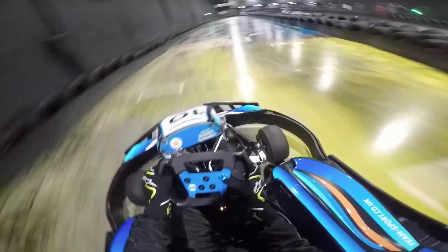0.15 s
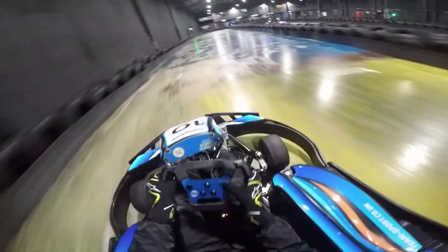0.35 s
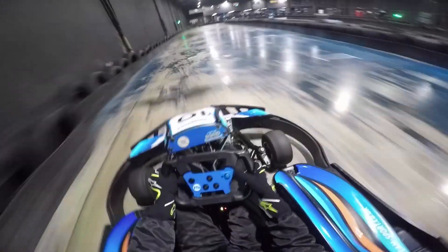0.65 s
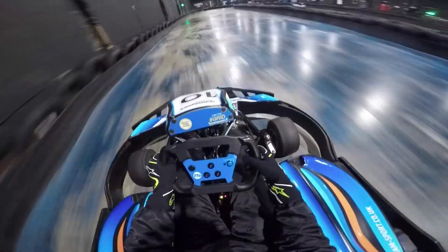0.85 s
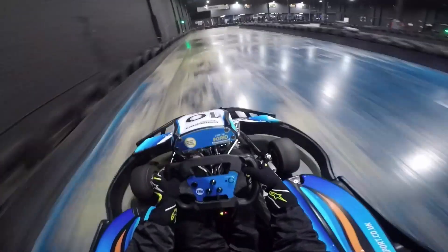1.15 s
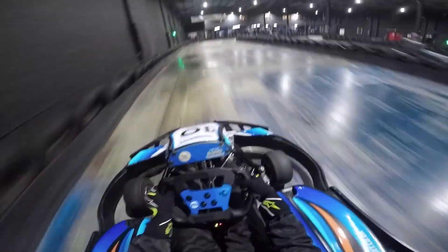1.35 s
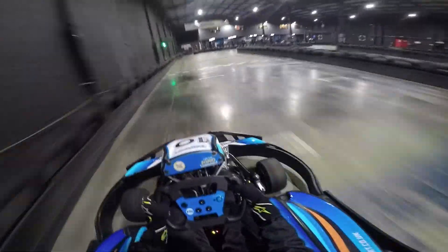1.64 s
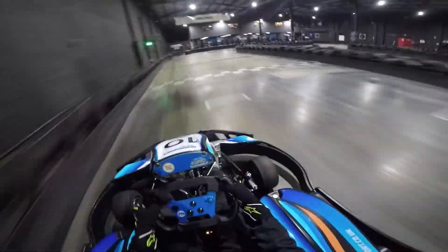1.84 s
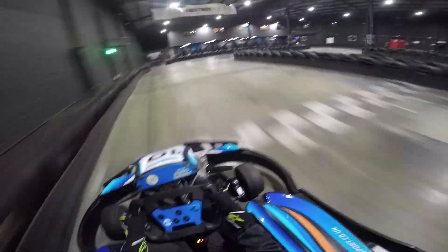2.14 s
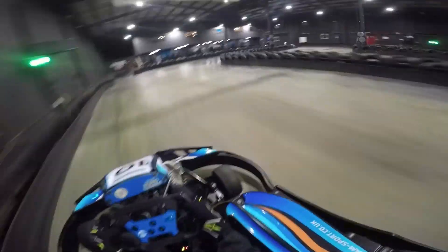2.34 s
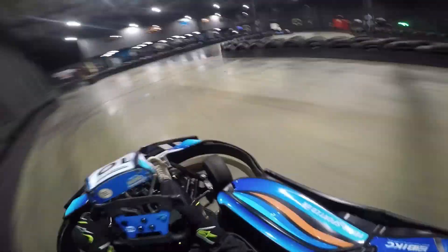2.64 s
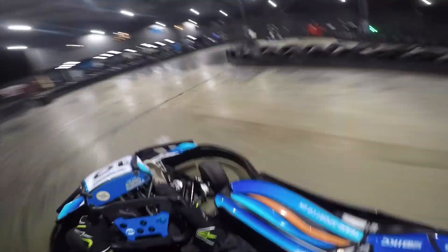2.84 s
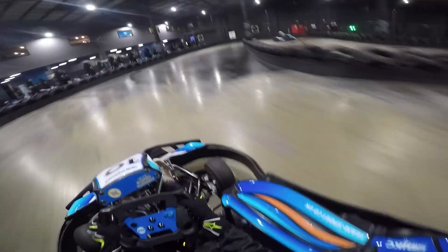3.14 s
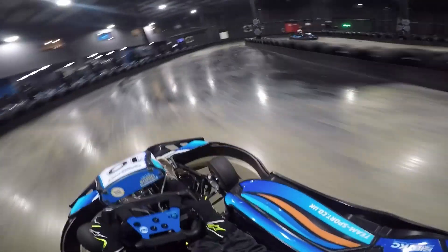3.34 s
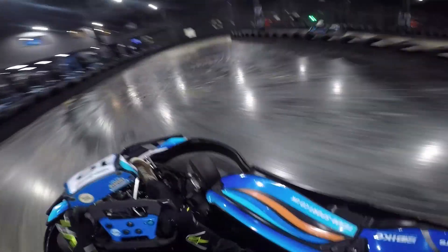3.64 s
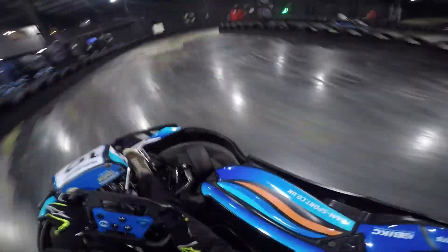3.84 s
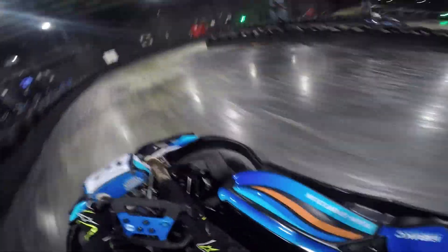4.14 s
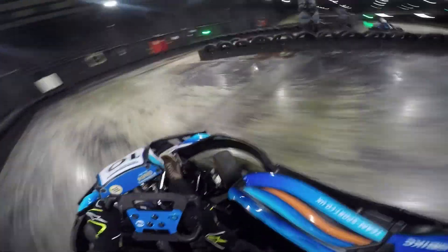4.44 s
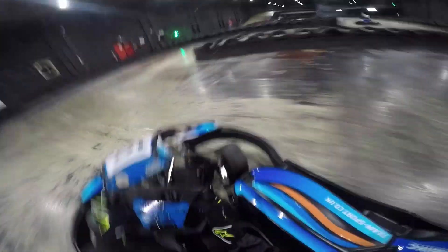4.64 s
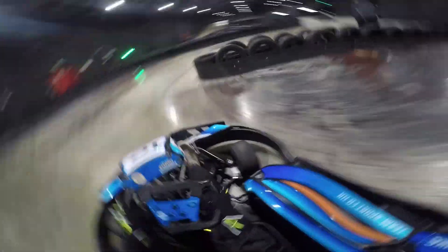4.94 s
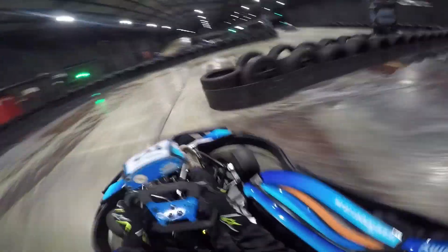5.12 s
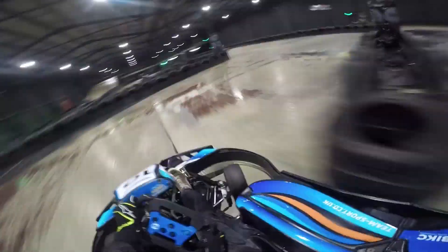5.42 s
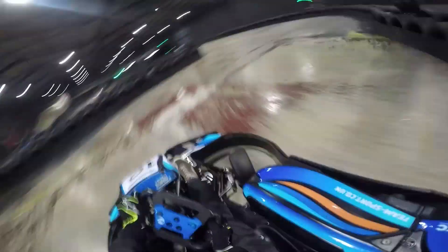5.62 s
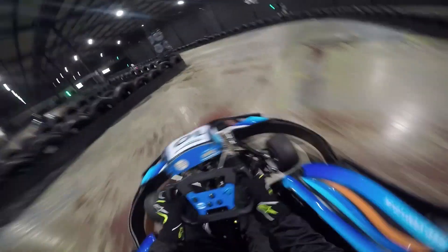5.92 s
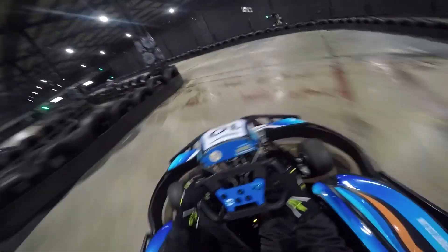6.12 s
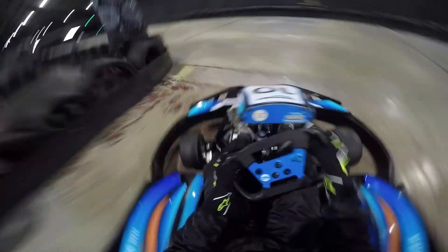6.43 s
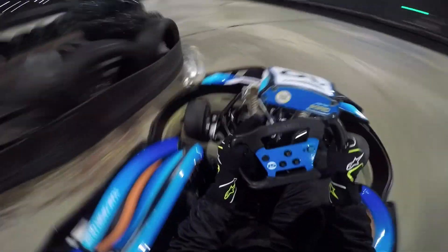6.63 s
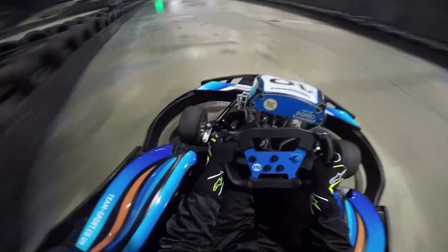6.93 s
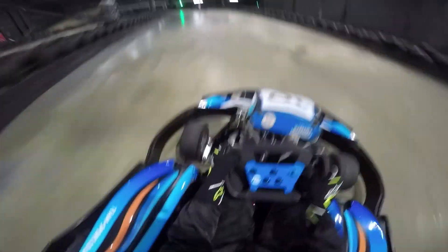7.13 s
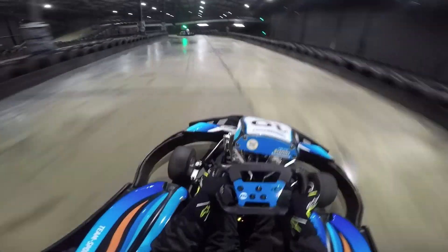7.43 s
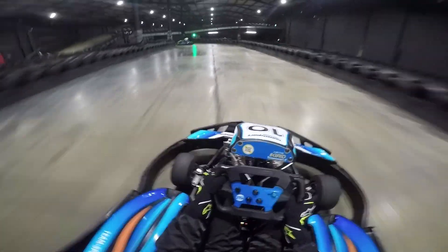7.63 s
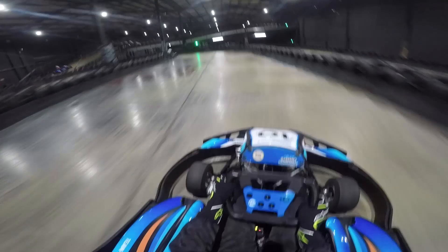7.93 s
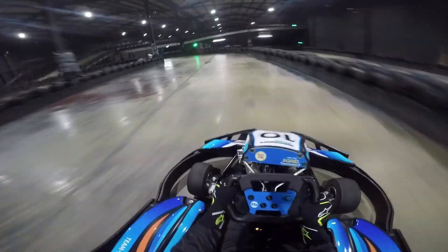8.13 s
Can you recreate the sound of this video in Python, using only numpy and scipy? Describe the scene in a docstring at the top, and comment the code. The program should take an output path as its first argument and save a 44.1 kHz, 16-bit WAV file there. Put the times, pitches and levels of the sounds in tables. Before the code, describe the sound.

Bursts of high tyre squeal and a few chassis knocks from a sliding electric kart, over low rumble on a smooth indoor track.

```python
"""An electric kart slides through the corners of a smooth indoor track, heard from the driver's helmet.
It opens on a thin tyre squeal and a knock, then the hiss of rubber scrubbing sideways. From about 3 s
the tyres stick and slip again: the lighter one first, then the loaded outer one, harsh and chirping,
until 6 s. The chassis knocks, the last scrubs die away, and after 7 s two squeals cross the ringing hall.
Under it all the wheels roll and air buffets the microphone."""
import sys
import numpy as np
from scipy import signal
from scipy.fft import rfft, irfft
from scipy.io import wavfile
from scipy.ndimage import uniform_filter1d

SR = 44100
rng = np.random.default_rng(int(sys.argv[2]) if len(sys.argv) > 2 else 0)


def transcribe(u):
    """Save the signal u as a 16-bit wav file named by the first command-line argument.

    u: samples, shape (n,) or (channels, n), limited to [-1, 1]; the rate is SR.
    q: integer samples, one column per channel.
    """
    v = np.clip(np.atleast_2d(u).T, -1, 1)
    q = np.round(v * 32767).astype(np.int16)
    wavfile.write(sys.argv[1], SR, q)


N = 364707
T = np.arange(N) / SR
HZ = np.fft.rfftfreq(N, 1 / SR)
ATTACK_S, RELEASE_S = 0.0073, 0.011  # edges of the kart's own squeals
SAG_OCT_PER_S = 0.115  # pitch sinks as speed is scrubbed off

# Slides of the loaded outer tyre. Each row: start and length in seconds, level in dB, pitch in Hz,
# overtones in dB, opening scoop and closing swoop in octaves.
OUTER_SLIDES = [(3.695, 0.99, -20, 3563, -8.5, 0, 0.25), (4.709, 0.13, -20.5, 3374, -11, 0.0022, 0.76),
                (4.904, 0.096, -22.5, 3347, -9, 0, .4), (5.395, 0.19, -19.5, 3218, -8, 0.011, 0.43),
                (5.595, .145, -20.5, 3375, -3.5, .25, .55), (5.785, 0.065, -21.5, 3700, -3, 0, 0.36),
                (5.847, .12, -26, 3450, -6, 0.0047, 0)]
# Slides of the lighter tyre. Each row: start and length in seconds, level in dB, pitch in Hz,
# overtones in dB.
INNER_SLIDES = [(0.089, 0.34, -29.5, 4433, -14.5), (2.776, 0.04, -30.5, 3350, -20),
                (3.147, 0.05, -29.5, 4310, -13), (3.306, 0.068, -32, 4330, -15),
                (3.485, 0.28, -27.5, 4340, -16), (3.684, 0.26, -27, 4040, -2),
                (5.014, 0.37, -32, 4220, -14), (5.867, 0.11, -27, 4050, -8)]
# Single grabs of the rubber. Each row: start in seconds, level in dB, pitch in Hz.
GRABS = [(4.166, -19, 3420), (4.513, -21, 3340), (4.577, -20, 3185), (4.612, -19, 3130),
         (4.635, -16.5, 3303), (4.914, -18.5, 3380), (4.984, -21.5, 3360), (5.406, -18, 3345),
         (5.796, -18, 3660), (5.843, -14.5, 3445)]
# Sideways scrubs. Each row: start and length in seconds, level in dB, centre in Hz, width in octaves.
SIDE_SCRUBS = [(0.152, 0.42, -38, 6660, .31), (1.418, .16, -33.5, 6770, 0.56), (1.42, .27, -28, 3270, 0.38),
               (2.12, 0.48, -47.5, 9450, .2), (2.923, 0.054, -33, 4070, 0.64),
               (3.344, .42, -40, 7940, 0.61), (3.757, 0.84, -29.5, 7450, 1),
               (4.722, 0.072, -25.5, 5200, 0.73), (5.25, .025, -30, 5070, 0.65),
               (6.02, 0.057, -27.5, 5700, .17), (6.03, 0.25, -27, 6000, 0.74),
               (6.089, 0.22, -31.5, 3780, 0.31), (6.595, 0.063, -35.5, 5040, 0.59)]
# Jolts of the chassis. Each row: start in seconds, level in dB, treble crack in dB relative to that.
JOLTS = [(0.166, -26, -18), (5.317, -26, -20), (5.37, -26.5, 14), (5.556, -21.5, -14), (5.734, -31, -16),
         (6.62, -27, -13), (7.254, -38, 3)]
# Modes a jolt sets ringing. Each row: pitch in Hz, level in dB, seconds to fall by 60 dB.
JOLT_MODES = [(1300, -7, 0.061), (1413, 13, 0.036), (1882, 9, 0.082), (2510, -18, 0.023), (3410, -3, 0.017)]
# Squeals across the hall. Each row: start and length in seconds, level in dB, pitch in Hz.
FAR_SLIDES = [(7.051, 0.59, -39.5, 4325), (7.62, 0.46, -36.5, 4173)]
# Tone of the wheels on the floor. Each row: frequency in Hz, level in dB.
ROLL_SPECTRUM = [(200, -4), (450, -9.5), (900, -9.5), (1300, -3.5), (1550, -6.5), (2300, -4.5),
                 (2900, -6.5), (3450, -2.5), (4500, -12), (5100, -15), (6500, -16.5), (7300, -23),
                 (10500, -31), (12000, -40.5), (15000, -44)]
# Modes of the rolling chassis, three low and two high. Each row: centre and width in Hz, level in dB.
CHASSIS_MODES = [(547.6, 20, 4), (646.7, 14, 1), (789, 20, -3), (1834, 158, 6.5), (2374, 350, 0.5)]
# Deep rumble of air on the microphone. Each row: frequency in Hz, level in dB.
AIR_SPECTRUM = [(10, -21), (24, 1.5), (42, -1.5), (60, -3), (85, -7.5), (110, -20), (500, -90)]
# Drumming of the frame. Each row: frequency in Hz, level in dB.
DRUM_SPECTRUM = [(40, -61), (90, 1), (128, 0.5), (150, -4.5), (200, -8), (400, -26), (1200, -50),
                 (3000, -90)]
# How hard floor and air shake the kart. Each row: time in seconds, level in dB.
SHAKE_CURVE = [(0.02, -14), (0.55, -13.5), (0.9, -19), (1.3, -11.5), (2.75, -18.5), (3.7, -17.3),
               (4.3, -21), (5.75, -22.4), (6.3, -16.5), (6.52, -24), (6.8, -20), (7.05, -23), (7.55, -15.5),
               (8.25, -13)]
# Extra ringing of the frame under cornering load. Each row: time in seconds, boost in dB.
LOAD_CURVE = [(0.02, -6), (0.55, 1.5), (1.2, 0), (2.2, 4), (3.3, 3), (4.2, -1.5), (5.3, 3), (6.3, -5.5),
              (8.25, -3)]
# Colour of the path from tyres to microphone. Each row: frequency in Hz, gain in dB.
PATH_EQ = [(1000, -8.5), (2700, 4), (3450, 6.5), (3900, 3), (4500, 3), (5100, -0.5), (5900, 2), (6700, 1.5),
           (7250, -5.5), (8100, 0), (9000, -8.5), (10500, -5.5), (11700, -9), (15000, -14)]
# Reverb of the hall. Each row: frequency in Hz, seconds to fall by 60 dB.
HALL_DECAY = [(200, 1.2), (2000, 2.3), (4000, 3.27), (8000, 1), (15000, 0.6)]


def stick_slip(hz, overtone_db, drift, fall_db, flutter_db=2.5, rasp_db=-11, judder_hz=22):
    """The voice of every squeal: tread grabs and lets go, so pitch and strength stumble with the floor."""
    size = len(hz)
    judder = np.cos(2 * np.pi * judder_hz * np.arange(size) / SR + wander(size, rate_hz=9.7))
    grip = unit(0.688 * judder + wander(size, rate_hz=55.4))  # the tyre hops, so grip comes in surges
    stumble = wander(size, rate_hz=80) + 0.35 * grip + 0.65 * wander(size, rate_hz=900)
    pitch = hz * np.exp(drift * stumble)
    phase = 2 * np.pi * np.cumsum(pitch) / SR
    tone = np.sin(phase) * amp(4.4 * wander(size, rate_hz=430))
    for k in range(2, 6):  # a harder grab sharpens the release and lifts the overtones
        strength = amp(overtone_db - fall_db * (k - 3) + grip + 3.7 * wander(size, rate_hz=150))
        tone += strength * np.sin(k * phase) * (k * pitch < SR / 2)
    rasp = 1 + amp(rasp_db) * wander(size, rate_hz=1040)  # grit under the tread frays every partial
    return unit(tone * rasp * amp(flutter_db * grip))


def outer_tyre(trim_db=-3.5, soft_db=-8, bite_s=0.011, scoop_s=0.026, swoop_s=0.085,
               mellow_db_per_oct=-20, stick_db=-7):
    """The harsh lead squeal: it bites, sags, then swoops down and mellows as the tyre finds grip."""
    out = np.zeros(N)
    for start, length, db, hz, overtone_db, scoop, swoop in OUTER_SLIDES:
        t = np.arange(0, length, 1 / SR)
        dive = swoop * np.clip(1 - (length - t) / min(swoop_s, length), 0, 1) ** 2
        octaves_flat = scoop * np.exp(-t / scoop_s) + SAG_OCT_PER_S * t + dive
        harsh_db = overtone_db + soft_db * np.exp(-t / bite_s) + mellow_db_per_oct * dive
        tone = stick_slip(hz * 2 ** -octaves_flat, harsh_db, drift=0.05, fall_db=3)
        add(out, start, amp(db + trim_db) * tone * swell(t, ATTACK_S, RELEASE_S))
    # the rubber holds just before each chirp, ducking the squeal
    stuck = sum(np.exp(-((T - start) / 0.0046 + 1) ** 2) for start, _, _ in GRABS)
    return out * amp(stick_db * stuck)


def light_tyre(trim_db=-1, fade_db_per_s=9):
    """The less loaded tyre sings higher and thinner; each squeal starts strong and fades."""
    out = np.zeros(N)
    for start, length, db, hz, overtone_db in INNER_SLIDES:
        t = np.arange(0, length, 1 / SR)
        tone = stick_slip(np.full(len(t), hz), overtone_db, drift=0.035, fall_db=6)
        add(out, start, amp(db + trim_db - fade_db_per_s * t) * tone * swell(t, ATTACK_S, RELEASE_S))
    return out


def chirps(trim_db=-1, length_s=0.011, fall_oct=0.1):
    """The rubber grabs once: a tiny falling squeak with a snappy start."""
    out, progress = np.zeros(N), np.linspace(0, 1, int(length_s * SR))
    envelope = unit(np.sin(np.pi * np.sqrt(progress)))
    for start, db, hz in GRABS:
        glide = hz * 2 ** (fall_oct * (0.5 - progress))
        tone = stick_slip(glide, overtone_db=-13, drift=0.04, fall_db=9, flutter_db=1.5)
        add(out, start, amp(db + trim_db) * tone * envelope)
    return out


def scrubs(grain_db=2.65, rise_share=0.12, t60_s=0.51):
    """Rubber skates without locking into a note: a grainy hiss that swells, holds and dies away."""
    out, t = np.zeros(N), np.arange(2 * SR) / SR
    f = np.fft.rfftfreq(len(t), 1 / SR)
    for start, length, db, hz, octaves in SIDE_SCRUBS:
        band = (1 + (np.log2((f + 1) / hz) / octaves) ** 2 / 2) ** -1.8
        hiss = unit(irfft(rfft(rng.standard_normal(len(t))) * band))
        rise = np.minimum(t / (rise_share * length), 1)
        tail_db = -60 * np.maximum(t - length, 0) / t60_s
        add(out, start, hiss * rise * amp(db + tail_db))
    return out * amp(grain_db * wander(N, rate_hz=26))


def knocks(crack_s=0.0019):
    """Frame and bodywork jolt: a crack over a few short modes, tuned a little differently each hit."""
    out, t = np.zeros(N), np.arange(SR // 8) / SR
    for start, db, crack_db in JOLTS:
        ring = sum(amp(mode_db - 60 * t / t60) * np.sin(2 * np.pi * hz * rng.uniform(0.94, 1.03) * t)
                   for hz, mode_db, t60 in JOLT_MODES)
        crack = signal.lfilter([1], [1, -0.55], rng.standard_normal(len(t))) * np.exp(-t / crack_s)
        add(out, start, amp(db) * (ring / 2 + amp(crack_db) * crack))
    return out


def far_tyres(trim_db=-1):
    """Soft-edged, sagging squeals from another part of the track."""
    out = np.zeros(N)
    for start, length, db, hz in FAR_SLIDES:
        t = np.arange(0, length, 1 / SR)
        tone = stick_slip(hz * 2 ** (-SAG_OCT_PER_S * t), overtone_db=-28, drift=0.075, fall_db=10)
        add(out, start, amp(db + trim_db) * tone * swell(t, attack_s=0.032, release_s=0.078))
    return out


def rolling(road_db=-33, hum_db=-46.5, ring_db=-35, road_share=0.35, hum_share=0.87, grain_db=0.9):
    """Floor texture shakes the wheels; the frame hums in its low modes, and load brings out the high."""
    modes = [amp(db) / (1 + ((HZ - hz) / width) ** 2) ** 1.44 for hz, width, db in CHASSIS_MODES]
    load_db = shake_db() + follow(LOAD_CURVE)
    road = amp(road_db + road_share * load_db) * noise(amp(read(ROLL_SPECTRUM, HZ)))
    hum = amp(hum_db + hum_share * shake_db()) * noise(sum(modes[:3]))
    ring = amp(ring_db + load_db) * noise(sum(modes[3:]))
    return (road + hum + ring) * amp(grain_db * wander(N, rate_hz=32))


def buffet(air_db=-15.5, drum_db=-21, air_share=0.33, drum_share=1.03):
    """The low bed: lumpy air on the microphone, nearly even, and frame drumming that rides the shake."""
    air = noise(amp(read(AIR_SPECTRUM, HZ)))
    drum = noise(amp(read(DRUM_SPECTRUM, HZ)))
    air = unit(air / uniform_filter1d(air ** 2, size=5000) ** 0.79)  # eddies arrive at an even strength
    return amp(air_db + air_share * shake_db()) * air + amp(drum_db + drum_share * shake_db()) * drum


def reflections(sound, decay, delay_s):
    """Sparse echoes of random sign, each band dying at its own speed."""
    taps = rng.standard_normal(SR) * (rng.random(SR) < 0.1)
    taps[:int(delay_s * SR)] = 0
    hz, t, bands = signal.stft(taps, SR, nperseg=256)
    tail = signal.istft(bands * amp(-60 * t / read(decay, hz)[:, None]), SR, nperseg=256)[1]
    return signal.fftconvolve(sound, tail / np.linalg.norm(tail))[:N]


def shake_db():
    """How far the shaking is above its average; each background layer follows a share of it."""
    db = follow(SHAKE_CURVE)
    return db - db.mean()


def swell(t, attack_s, release_s):
    """Attack, hold and release over the times t."""
    return np.minimum(t / attack_s, 1) * np.minimum((t[-1] - t) / release_s, 1)


def wander(size, rate_hz):
    """Smooth random modulation of rms about 1, rolling off above rate_hz."""
    white = rng.standard_normal(2 ** int(np.ceil(np.log2(size + SR / 2))))
    hz = np.fft.rfftfreq(len(white), 1 / SR)
    return unit(irfft(rfft(white) / np.sqrt(1 + (hz / rate_hz) ** 4)))[:size]


def noise(gain):
    """Noise of rms 1 with the given spectrum."""
    return unit(irfft(rfft(rng.standard_normal(N)) * gain, N))


def read(points, hz):
    """Reads a spectrum table on a log-frequency axis."""
    f, value = np.transpose(points)
    return np.interp(np.log(hz + 1), np.log(f + 1), value)


def follow(curve):
    """Draws an automation curve across the whole scene."""
    return np.interp(T, *np.transpose(curve))


def add(mix, start_s, sound):
    """Lays a sound into the mix."""
    part = mix[max(round(start_s * SR), 0):][:len(sound)]
    part += sound[:len(part)]


def amp(db):
    """Decibels to gain."""
    return 10 ** (np.asarray(db) / 20)


def unit(x):
    """Scales to rms 1."""
    return x / np.sqrt(np.mean(x ** 2) + 1e-20)


def scene(near_db=-8, hall_db=-8):
    """Tyres and knocks heard directly, off floor and barriers, and through the hall, over the rumble."""
    squeals_and_knocks = outer_tyre() + light_tyre() + chirps() + knocks()
    direct = squeals_and_knocks + scrubs()
    near = reflections(squeals_and_knocks, decay=[(1000, 0.046), (10000, 0.094)], delay_s=0.002)
    hall = reflections(amp(hall_db) * direct + far_tyres(), HALL_DECAY, delay_s=0.0088)
    foreground = direct + amp(near_db) * near + hall
    at_helmet = irfft(rfft(foreground) * amp(read(PATH_EQ, HZ)), N)
    return (at_helmet + rolling() + buffet())[None]


def record(dry, ceiling=0.95, cutoff_hz=15250):
    """A soft clip rounds off the peaks, then a steep low-pass trims the top."""
    rounded = dry / (1 + (dry / ceiling) ** 8) ** (1 / 8)
    lowpass = signal.firwin(511, cutoff_hz, window=("kaiser", 9), fs=SR)
    return signal.oaconvolve(rounded, lowpass[None], "same")


dry = scene()
out = record(dry)
transcribe(out)
```